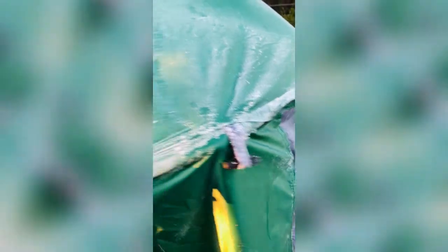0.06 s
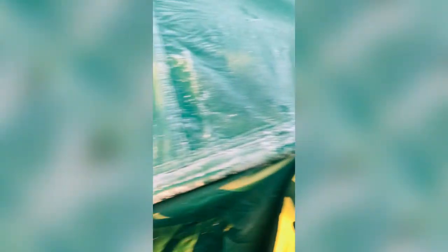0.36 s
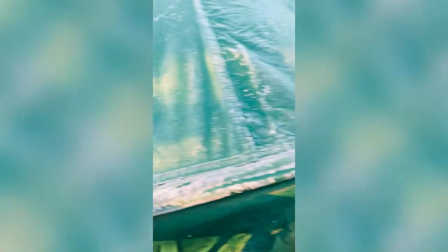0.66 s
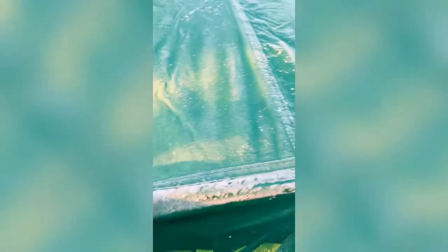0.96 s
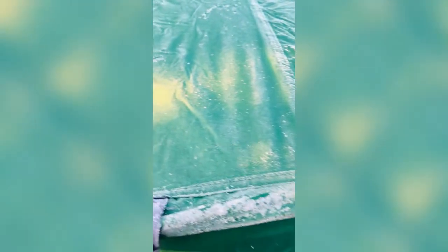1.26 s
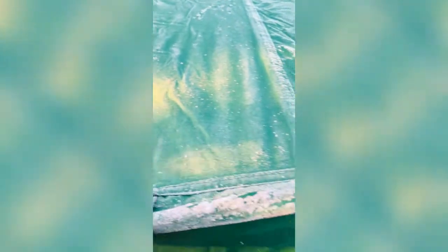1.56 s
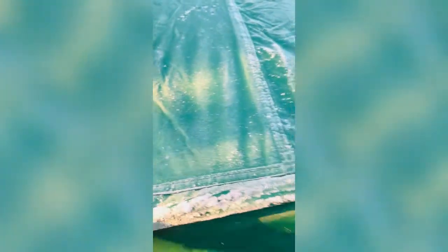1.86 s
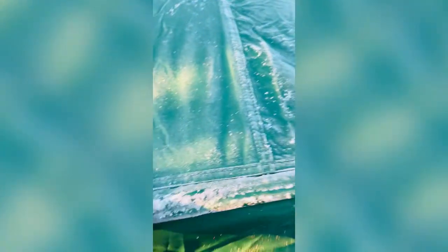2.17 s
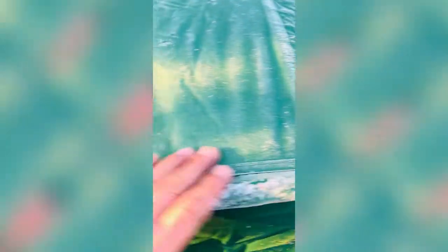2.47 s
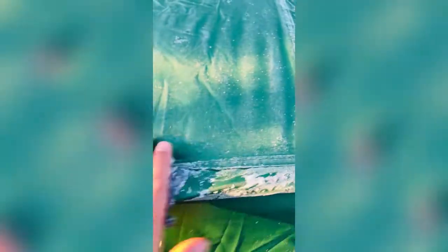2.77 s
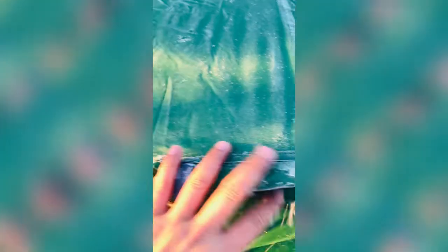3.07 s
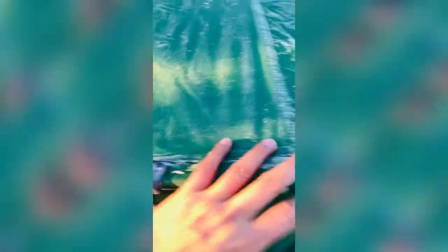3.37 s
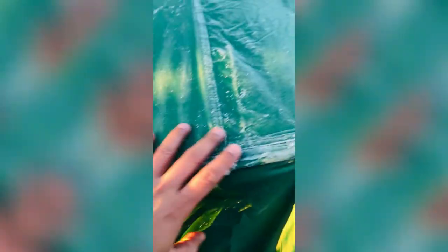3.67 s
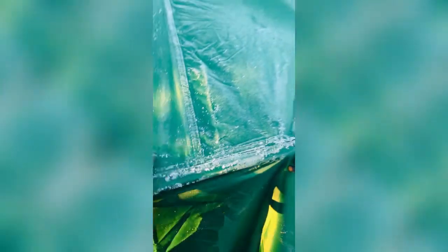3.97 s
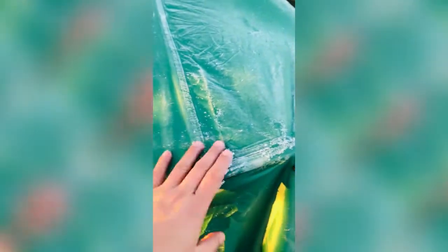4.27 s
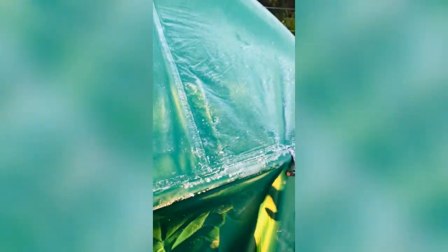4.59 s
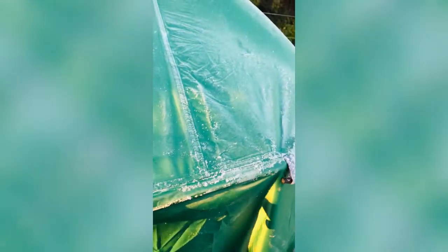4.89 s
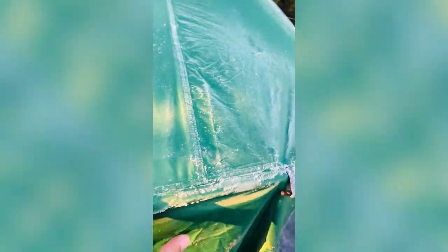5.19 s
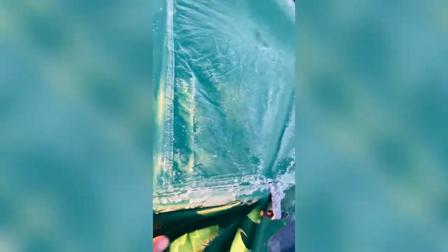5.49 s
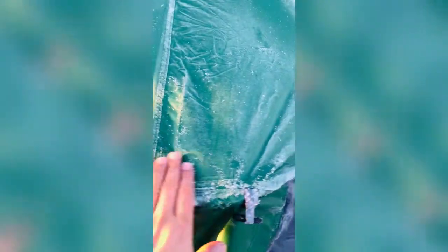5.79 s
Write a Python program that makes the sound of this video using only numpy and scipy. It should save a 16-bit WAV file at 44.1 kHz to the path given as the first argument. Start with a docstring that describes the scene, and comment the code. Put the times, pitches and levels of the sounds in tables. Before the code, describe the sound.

A bare hand rubs frost-covered tent fabric in repeated strokes, making a crisp, scratchy hiss with small icy ticks.

```python
"""A bare hand brushes the frosted fabric of a tent, close to a mono microphone. Ice crystals break under
the skin and hiss, while the stiff cloth rasps, ticks and now and then thumps. From about 2 s the hand rubs
to and fro, louder and more with the palm, speeding up and slowing down in each stroke. After 4 s taut
patches of cloth sing briefly; past 5 s a run of creases flips before the last long stroke. Throughout,
the low, even rumble of the open air lies behind it."""
import sys
import numpy as np
from scipy import signal
from scipy.fft import rfft, irfft, next_fast_len
from scipy.io import wavfile
from scipy.ndimage import uniform_filter1d, map_coordinates

SR = 44100
rng = np.random.default_rng(int(sys.argv[2]) if len(sys.argv) > 2 else 0)


def dump_mix(stems):
    """Bounce the given channels to the path in sys.argv[1] as a 16-bit WAV at rate SR."""
    frames = np.atleast_2d(stems).T  # one column per channel
    limited = np.clip(frames, -1, 1)  # hard clip at full scale
    pcm = np.round(limited * 32767).astype(np.int16)
    wavfile.write(sys.argv[1], SR, pcm)


N = 261954

# Spectrum of breaking ice. Each row: frequency in Hz, relative level in dB.
ICE_SPECTRUM = [(500, -18), (2000, -0.5), (4200, -3), (8000, 1.5), (11500, 6), (14000, 0), (15800, -0.5)]


def rubbing():
    """Friction noise: a faster hand breaks more crystals a second, so crackle merges into a loud hiss."""
    # Spectra of frost and cloth under a light touch and under the flat palm.
    # Each row: frequency in Hz, relative level in dB.
    frost_light = [(1500, -38), (3000, -20), (4200, -5), (5500, -4.5), (7300, -2.5), (9000, -2.5),
                   (10300, 1), (11500, 2), (12700, -1.5), (14200, -6), (15800, -6)]
    frost_palm = [(1500, -22.5), (3000, -26), (4500, -11.5), (6000, -5), (7800, -2.5), (9000, -3),
                  (10200, 0.5), (11700, 0.5), (12700, -1.5), (14000, -6.5), (15800, -13.5)]
    cloth_light = [(300, -4.5), (800, -2), (1400, -2.5), (2100, -1.5), (3000, -0.5), (4000, 1.5),
                   (5000, -3.5), (7500, -24)]
    cloth_palm = [(350, -16), (600, -3), (950, 0), (1400, 2), (2100, -3.5), (3000, -0.5), (4200, -2.5),
                  (5200, -3), (7500, -18)]
    # How the hand lies. Each row: time in seconds, share of flat palm from 0 to 1.
    palm_share = [(1.7, 0.04), (2.8, 0.37), (3.05, 1), (4.3, 0.6), (5.1, 0.24), (5.6, 1), (5.94, 0.6)]
    # Brightness of the hiss. Each row: time in seconds, gain above 13.3 kHz in dB.
    treble_shelf = [(0, 1.5), (2.05, 3.5), (2.8, -1), (3.35, -4), (3.7, 0), (4.3, 1), (5.2, 6), (5.38, -8),
                    (5.6, 7), (5.94, -2)]
    hiss_level, rasp_level = stroke_levels()
    palm = curve(palm_share)
    breaks_per_s = 7000 * (hiss_level / amp(-34)) ** .9
    slowness = 1 / (1 + breaks_per_s / 18000)
    stick_slip = amp(slowness * (1.2 * wobble(70) + 0.76 * wobble(400)))  # slow skin catches on frost

    def contact(light, flat, smooth):
        """Source and filter: the same fractures sound through a light touch and under the flat palm."""
        breaks = fractures(breaks_per_s, spread_db=4.0, smooth=smooth)
        blend = (1 - palm) * coloured(breaks, light) + palm * coloured(breaks, flat)
        return patchy(blend, depth_db=1.5)

    flakes = coloured(fractures(45, spread_db=6, smooth=0), ICE_SPECTRUM)  # bigger flakes let go
    hiss = contact(frost_light, frost_palm, smooth=0.87) + amp(-17.0) * flakes
    treble = filtered(hiss, lambda hz: 1 / (1 + (13300 / (hz + 1)) ** 24))
    hiss = hiss + (amp(curve(treble_shelf)) - 1) * treble
    rasp = contact(cloth_light, cloth_palm, smooth=0.6)
    return stick_slip * (hiss_level * hiss + rasp_level * rasp)


def stroke_levels():
    """Incoherent sources add in power: hiss and rasp of each stroke join the resting hand's rustle."""
    # Strokes of the hand. Each row: time of top speed, time speeding up and time slowing down in
    # seconds, hiss level in dB, rasp in dB relative to the hiss.
    strokes = [ (.023, 0.042, 0.67, -31.5, -7.5), (.414, 0.2, 0.13, -35, -11.5),
               (.633, .22, .26, -33, -8.5), (.778, .025, 0.1, -35, -13.5), (.885, .08, 0.064, -32.5, -8),
               (1.055, 0.041, 0.043, -45.5, -6), (1.13, 0.055, 0.082, -36, -6.5),
               (1.292, 0.084, 0.06, -41, -9), (1.57, 0.045, 0.059, -52, -4),
               (1.623, 0.032, 0.017, -31, -13.5), (1.725, 0.016, .055, -35.5, -5.5),
               (1.821, .16, .12, -41, -12), (1.969, 0.078, 0.064, -28, -15), (2.09, 0.16, 0.093, -26, -10),
               (2.15, .04, 0.021, -34, -10), (2.263, 0.11, 0.078, -34, -7), (2.36, 0.055, 0.09, -50, -1),
               (2.482, 0.11, 0.05, -26.7, -10.5), (2.582, 0.1, 0.12, -30.5, -10),
               (2.808, 0.14, 0.069, -24.5, -12.5), (3.07, .23, 0.077, -24.5, -11),
               (3.126, .04, .012, -29.5, -12), (3.195, 0.057, 0.035, -36, -3.5),
               (3.405, 0.2, 0.082, -27.5, -11.5), (3.609, 0.077, 0.047, -32, -9),
               (3.796, 0.21, 0.092, -28.5, -10.5), (4.052, 0.15, 0.083, -26.5, -8),
               (4.29, 0.15, 0.11, -22.5, -11), (4.53, 0.13, 0.13, -30, -7), (4.645, .12, 0.13, -26, -9.5),
               (4.75, .08, .11, -39.5, -3.5), (5.061, .18, .19, -33.5, -10),
               (5.216, 0.083, 0.022, -35.5, -4), (5.25, .04, 0.26, -46.5, -4), (5.53, 0.19, .12, -62, 11),
               (5.575, .01, 0.25, -36.5, -9.5), (5.856, 0.36, 0.23, -33, -7)]
    # The hand eases off. Each row: centre and half length in seconds, drop of the rustle in dB.
    lifts = [(1.002, 0.024, 3.5), (1.464, 0.073, 16), (1.66, 0.0088, 9), (3.514, 0.036, 2.5),
             (3.878, 0.018, 3.5), (4.403, 0.016, 4), (4.863, 0.042, 8), (5.507, 0.056, 6)]
    t = np.arange(N) / SR
    eased_db = sum(drop * bell(t, s, half) for s, half, drop in lifts)
    hiss_power = amp(-48.5 - eased_db) ** 2  # the resting hand
    rasp_power = amp(-3) ** 2 * hiss_power
    hiss_exponent, rasp_exponent = 1.64, 1.35  # as the hand slows, the ice falls silent before the cloth
    for s, rise, fall, db, rasp_db in strokes:
        moving = slice(*np.searchsorted(t, [s - rise, s + fall]))
        speed = np.sin(np.pi / 2 * np.interp(t[moving], [s - rise, s, s + fall], [0, 1, 0]))
        hiss_power[moving] += (amp(db) * speed ** hiss_exponent) ** 2
        rasp_power[moving] += (amp(db + rasp_db) * speed ** rasp_exponent) ** 2
    return np.sqrt(hiss_power), np.sqrt(rasp_power)


def fractures(per_s, spread_db, smooth, size=N):
    """Shot noise: tiny random breaks of uneven size over a share of smooth sliding noise, at rms 1."""
    chance = np.clip(per_s / SR, 0, 1)
    breaks = (rng.random(size) < chance) / np.sqrt(chance)
    signs = rng.choice([-1, 1], size)
    strengths = amp(spread_db * np.clip(rng.standard_normal(size), -2.5, 2.5))
    return unit(unit(breaks * signs * strengths) + smooth * rng.standard_normal(size))


def patchy(x, depth_db):
    """Time-varying filtering: the colour shifts at random, in smooth patches across frequency and time."""
    spectra = signal.stft(x, nperseg=512)[2]
    field = uniform_filter1d(rng.standard_normal(spectra.shape), 5, axis=0)  # smooth across frequency
    field = uniform_filter1d(field, 22, axis=1)  # and across time
    return unit(signal.istft(spectra * amp(depth_db * unit(field)), nperseg=512)[1][:N])


def ice_snaps():
    """Brittle fracture: a piece of ice snaps off and releases its strain in one bright click."""
    # Each row: start in seconds, peak level in dB before the common gain.
    snaps = [(0.025, -13), (0.2244, -25), (0.7734, -18), (0.824, -19), (1.669, -23), (1.724, -13.5),
             (2.0622, -9), (2.2974, -20), (5.245, -16), (5.4705, -22)]
    return ticks(snaps, ICE_SPECTRUM, tail_t60=.012, crumble=.15, gain_db=1)


def crease_flips():
    """Buckling: a crease of the stiff cloth flips over with a tick."""
    # Each row: start in seconds, peak level in dB before the common gain.
    creases = [(1.1395, -21), (1.2432, -28), (2.2643, -21), (5.297, -30), (5.3172, -24), (5.3487, -32),
               (5.368, -30), (5.4085, -28), (5.4505, -26), (5.6172, -20)]
    # Spectrum of a flipping crease. Each row: frequency in Hz, relative level in dB.
    crease_spectrum = [(600, -1), (2000, -2), (3700, 1), (5100, -3), (6800, 2.5), (8500, -9), (10800, -9),
                       (15000, -23)]
    return ticks(creases, crease_spectrum, tail_t60=.009, crumble=.3, gain_db=2.5)


def ticks(rows, spectrum, tail_t60, crumble, gain_db):
    """Impulse excitation: a sharp pulse and its crumbling tail take on the colour of the material."""
    track, t = np.zeros(N), np.arange(SR // 20) / SR
    body = impulse_response(spectrum)
    for s, db in rows:
        burst = (t == 0) + crumble * rng.standard_normal(len(t)) * amp(-60 * t / tail_t60)
        tick = signal.fftconvolve(burst, body)
        add(track, s, amp(db + gain_db) * tick / np.abs(tick).max())
    return track


def finger_flicks():
    """Sliding friction: a fingertip skids a short way and raises a brief swell of icy crackle."""
    # Each row: centre in seconds, level in dB, half length in seconds.
    flicks = [(0.036, -30, 0.0064), (0.891, -30.5, 0.0074), (1.142, -28, 0.0028), (1.615, -28, 0.0025),
              (1.623, -28.5, 0.0027), (1.675, -36, .0012), (1.725, -33.5, 0.0046), (3.155, -33, 0.0027),
              (5.578, -36, .003)]
    track, t = np.zeros(N), np.arange(SR // 20) / SR
    for s, db, half in flicks:
        skid = coloured(fractures(12000, spread_db=5.0, smooth=.8, size=len(t)), ICE_SPECTRUM)
        add(track, s - t.mean(), amp(db) * bell(t, t.mean(), half) * skid)
    return track


def singing_cloth():
    """Forced resonance: scraping fingers briefly drive one mode of a taut patch of cloth."""
    # Each row: centre in seconds, level in dB, resonance in Hz, half length in seconds.
    patches = [(1.138, -39, 2960, 0.0055), (1.613, -41, 4200, 0.011), (4.048, -57, 1350, 0.036),
               (4.301, -46, 1410, 0.048), (4.542, -43, 1320, 0.044), (4.654, -36, 3920, 0.032),
               (5.712, -43, 1370, 0.016), (5.85, -42.5, 3030, 0.055)]
    track, t = np.zeros(N), np.arange(SR // 4) / SR
    for s, db, centre_hz, half in patches:
        scrape = fractures(4000, spread_db=2.0, smooth=.5, size=len(t))
        tone = resonate(scrape, centre_hz, q=2.4)
        add(track, s - t.mean(), amp(db) * bell(t, t.mean(), half) * tone)
    return track


def wall_thumps():
    """Dispersion: the high part of a bump running through the slack wall arrives first, so pitch drops."""
    # Each row: start in seconds, level in dB, first and final pitch in Hz, 60 dB decay time in seconds.
    bumps = [(0.53, -32.5, 148, 90.5, 0.16), (1.147, -31, 654, 252, 0.074), (1.228, -32.5, 241, 140, 0.12),
             (1.633, -35, 350, 150, 0.053), (2.167, -36, 220, 109, 0.092), (2.222, -32.5, 220, 148, 0.066),
             (3.195, -23.5, 740, 94, 0.069), (5.678, -34, 342, 247, 0.084)]
    glide_s, attack_s, flap_share = 0.0046, 0.0014, 0.37
    track, t = np.zeros(N), np.arange(SR // 4) / SR
    for s, db, start_hz, end_hz, t60 in bumps:
        hz = end_hz + (start_hz - end_hz) * np.exp(-t / glide_s)
        noise = rng.standard_normal(len(t))
        flapping = unit(uniform_filter1d(uniform_filter1d(noise, size=40), size=28))
        wave = np.sin(2 * np.pi * np.cumsum(hz) / SR) + flap_share * flapping
        envelope = amp(db - 60 * t / t60) * (1 - np.exp(-t / attack_s))
        add(track, s, envelope * wave)
    return track


def open_air():
    """Ambient noise: a distant, slightly unsteady rumble with a hollow resonance of ground and tent wall."""
    # Spectrum of the rumble. Each row: frequency in Hz, relative level in dB.
    rumble_spectrum = [(20, -36), (35, -20), (52, -2), (75, -0.5), (115, 1), (170, -6), (300, -5.5),
                       (450, -9.5), (750, -11.5), (1000, -15), (1300, -21), (2500, -27.5), (5000, -47),
                       (15000, -32)]
    # Course of the rumble. Each row: time in seconds, mean level in dB.
    rumble_level = [(0, -42.5), (.3, -47.5), (1.6, -49.5), (2.2, -47.5), (5.94, -48)]
    # The hollow tone sinks as the microphone moves along the tent.
    # Each row: time in seconds, power share of the lower tone from 0 to 1.
    lower_share = [(2.9, 0), (4.0, 1)]
    lower = curve(lower_share)
    high_tone = resonate(rng.standard_normal(N), centre_hz=560, q=2.64)
    low_tone = resonate(rng.standard_normal(N), centre_hz=371, q=2.64)
    hollow = np.sqrt(1 - lower) * high_tone + np.sqrt(lower) * low_tone
    level = amp(curve(rumble_level) + 1.33 * wobble(11))
    rumble = coloured(rng.standard_normal(N), rumble_spectrum)
    return level * (rumble + amp(-8.5) * hollow)


def amp(db):
    """Decibels to amplitude ratio."""
    return np.exp(np.asarray(db) * (np.log(10) / 20))


def unit(x):
    """Normalisation to rms 1."""
    return x / np.sqrt(np.mean(x ** 2) + 1e-20)


def curve(rows):
    """Linear interpolation of (seconds, value) rows, one value a sample."""
    return np.interp(np.arange(N) / SR, *np.transpose(rows))


def bell(t, centre, half):
    """Gaussian envelope whose half length is its standard deviation."""
    return np.exp(-.5 * ((t - centre) / half) ** 2)


def wobble(per_s):
    """Random modulation: a smooth curve through per_s random knots a second."""
    knots = rng.standard_normal(int(N * per_s / SR) + 4)
    return map_coordinates(knots, [np.arange(N) * per_s / SR])


def gain(spectrum, hz):
    """Magnitude response from (Hz, dB) rows, interpolated on a logarithmic frequency axis."""
    row_hz, db = np.transpose(spectrum)
    return amp(np.interp(np.log(hz + 1), np.log(row_hz + 1), db))


def filtered(x, response):
    """Linear filtering: the spectrum of x times a frequency response."""
    size = next_fast_len(len(x) + 4096, real=True)
    return irfft(rfft(x, size) * response(np.fft.rfftfreq(size, 1 / SR)), size)[:len(x)]


def coloured(x, spectrum):
    """Spectral shaping of x, at rms 1."""
    return unit(filtered(x, lambda hz: gain(spectrum, hz)))


def resonate(x, centre_hz, q):
    """Resonance: x passes twice through the band-pass of one damped mode; rms 1."""
    def response(hz):
        damping = 1j * hz * centre_hz / q
        return (damping / (centre_hz ** 2 - hz ** 2 + damping)) ** 2
    return unit(filtered(x, response))


def impulse_response(spectrum, size=1024):
    """Minimum phase: folding the cepstrum gives a causal response with the given spectrum."""
    cepstrum = irfft(np.log(gain(spectrum, np.fft.rfftfreq(size, 1 / SR))))
    cepstrum[1:size // 2] *= 2
    cepstrum[size // 2 + 1:] = 0
    return irfft(np.exp(rfft(cepstrum)))


def add(track, s, sound):
    """Superpose a sound on the track from s seconds on."""
    part = track[round(s * SR):][:len(sound)]
    part += sound[:len(part)]


def scene():
    """Superposition: all sources sum at one microphone, which feeds both channels."""
    transients = ice_snaps() + crease_flips() + wall_thumps()
    mono = transients + rubbing() + singing_cloth() + finger_flicks() + open_air()
    return np.array([mono, mono])


def record(dry):
    """Band limiting: the microphone sheds the deepest bass, and nothing passes above the upper limit."""
    low_hz, top_hz = 40, 15830
    passband = lambda hz: (hz < top_hz) / np.sqrt(1 + (low_hz / (hz + 1)) ** 8)
    return np.array([filtered(channel, passband) for channel in dry])


dry = scene()
out = record(dry)
dump_mix(out)
```